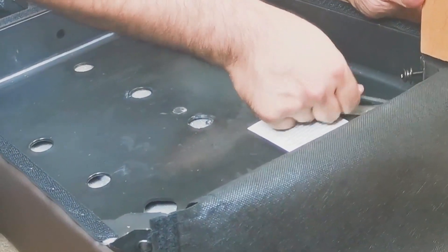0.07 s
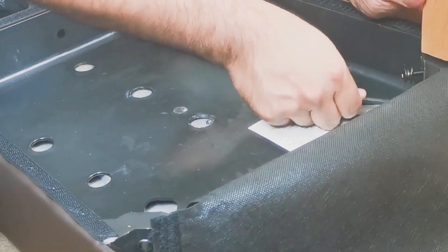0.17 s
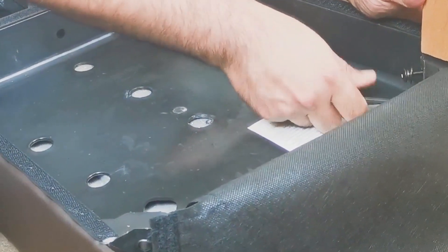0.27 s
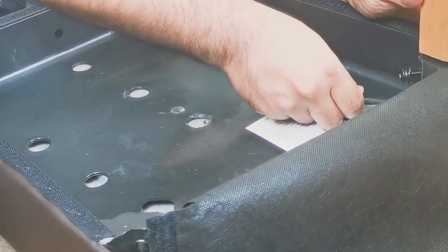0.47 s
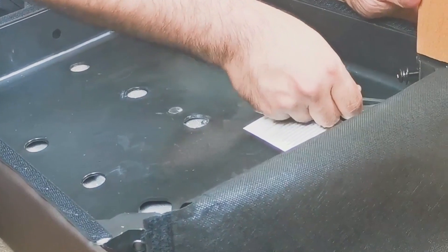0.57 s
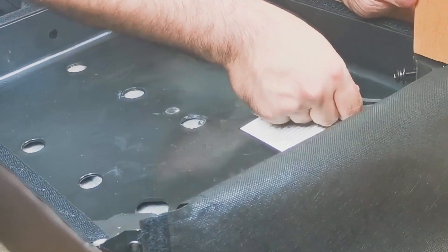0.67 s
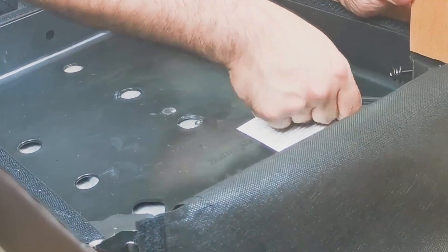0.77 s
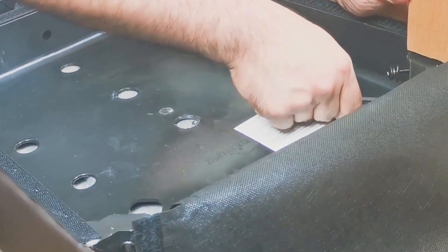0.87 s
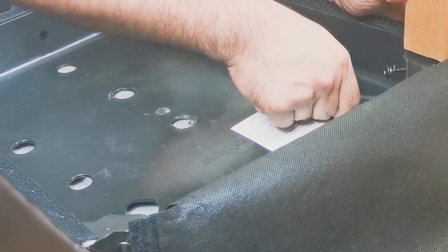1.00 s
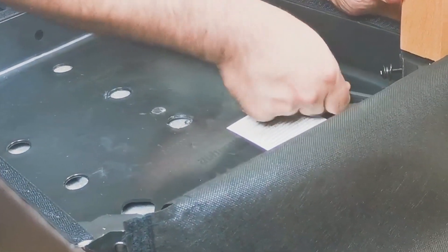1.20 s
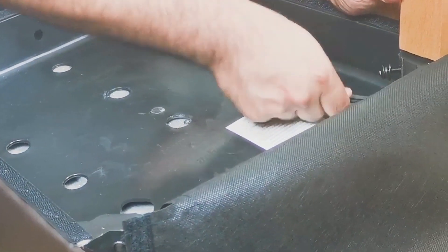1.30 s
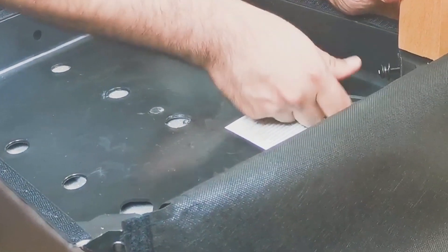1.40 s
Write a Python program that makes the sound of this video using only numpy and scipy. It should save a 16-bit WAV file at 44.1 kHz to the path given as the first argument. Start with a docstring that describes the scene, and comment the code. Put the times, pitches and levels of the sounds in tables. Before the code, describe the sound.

A single loud, hollow clack with a short ring comes early, followed by much quieter hand rustles, a low soft thud and small metallic clinks, strongest near the end, close up in a small, lively room.

```python
"""Chair assembly in a small, bare room

Stereo, with the direct sound earlier and louder in the left microphone. One hard knock rings the seat
pan: filtered noise bursts, then decaying sines. Loose steel screws and a key tick and clink as fingers
pick among them: short noise cracks with ringing modes. Between the clinks the hand rubs, softly bumps
and flexes the pan (uneven noise, band-limited bursts, low modes), over faint, steady room noise."""
import sys
import numpy as np
from scipy import signal
from scipy.fft import rfft, irfft, next_fast_len
from scipy.io import wavfile
from scipy.ndimage import map_coordinates

SR = 44100
rng = np.random.default_rng(int(sys.argv[2]) if len(sys.argv) > 2 else 0)


def put_to_file(sound):
    """Save the sound as 16-bit audio at rate SR, in the file named by the first command-line argument."""
    columns = np.atleast_2d(sound).T  # one column per channel
    safe = np.clip(columns, -1, 1)
    whole_steps = np.round(safe * 32767)
    wavfile.write(sys.argv[1], SR, whole_steps.astype(np.int16))


N = 63945  # samples

TAIL_S, RING_S = 0.55, 0.56  # lengths computed for room tails and contacts, and for ringing modes


def amp(db):
    """Decibels to gain."""
    return 10 ** (np.asarray(db) / 20)


def unit(x):
    """Scale to rms 1."""
    return x / np.sqrt(np.mean(x ** 2) + 1e-20)


def along(points, hz):
    """Read (f/Hz, value) points on a log frequency axis."""
    f, value = np.transpose(points)
    return np.interp(np.log(hz + 1), np.log(f + 1), value)


def since(s):
    """Seconds since a moment, zero before it."""
    return np.maximum(np.arange(N) / SR - s, 0)


def fade(t, attack, t60):
    """Exponential rise with time constant attack, times a 60 dB decay in t60 (both s)."""
    return (1 - np.exp(-t / attack)) * np.exp(-np.log(1000) * t / t60)


def placed(x, s):
    """Start a stereo sound at s seconds and cut it at the end of the scene."""
    return np.pad(x, ((0, 0), (round(s * SR), N)))[:, :N]


def filtered(x, response):
    """Apply a zero-phase gain that depends on frequency."""
    m = next_fast_len(N + 8192)
    return irfft(rfft(x, m) * response(np.fft.rfftfreq(m, 1 / SR)), m)[..., :N]


def coloured(x, colour_db):
    """Causal minimum-phase filter with a colour in dB; keeps the level of white noise."""
    m = 2 * next_fast_len(x.shape[-1] // 2 + 2048)
    gain = np.maximum(amp(colour_db(np.fft.rfftfreq(m, 1 / SR))), 1e-6)
    # folding the cepstrum onto positive times makes the filter causal
    cepstrum = irfft(np.log(unit(gain)), m)
    cepstrum[1:m // 2] *= 2
    cepstrum[m // 2 + 1:] = 0
    return irfft(rfft(x, m) * np.exp(rfft(cepstrum)), m)[..., :x.shape[-1]]


def noise(colour_db):
    """Steady noise of rms 1 with a colour in dB."""
    return unit(filtered(rng.standard_normal(N), lambda hz: amp(colour_db(hz))))


# likeness of the left and right microphones: f/Hz, correlation
LIKENESS = [(150, .95), (300, 0.28), (600, 0.035), (1500, 0.0035), (6000, 0)]


def half_angle(hz):
    """Half the angle whose cosine is the left-right correlation at a frequency."""
    return np.arccos(np.clip(along(LIKENESS, hz), -1, 1)) / 2


def spread(pair):
    """Turn two unrelated signals into left and right, alike in the bass."""
    mid, side = filtered(pair, lambda hz: np.array([np.cos(half_angle(hz)), np.sin(half_angle(hz))]))
    return np.array([mid + side, mid - side])


LEAD_SAMPLES, LEFT_DB = 4, 2  # delay of the right side; gain of the left, equal cut of the right


def direct(x):
    """The direct sound reaches the left microphone earlier and louder."""
    return np.array([x, np.roll(x, LEAD_SAMPLES)]) * amp([[LEFT_DB], [-LEFT_DB]])


ROOM_DB, ROOM_LEFT_DB = 1.5, 1.5  # tail energy; gain of the left, equal cut of the right
# room decay: f/Hz, t60/s
ROOM_DECAY = [(120, .45), (400, 0.38), (1500, 0.38), (4000, 0.35), (8000, 0.35), (12000, 0.3)]


def room_tail(build_s):
    """A fresh diffuse room answer: noise decaying by band, alike in the bass, stronger on the left."""
    age = np.arange(int(TAIL_S * SR)) / SR
    hz, t, z = signal.stft(rng.standard_normal((2, len(age))), SR, nperseg=256)
    decay = np.exp(-np.log(1000) * t / along(ROOM_DECAY, hz)[:, None])
    turn = half_angle(hz)[:, None]
    z = z * decay * np.array([np.cos(turn), np.sin(turn)])
    mid, side = signal.istft(z, SR, nperseg=256)[1][:, :len(age)]
    tail = np.array([mid + side, mid - side]) * (1 - np.exp(-age / build_s))
    return unit(tail) / np.sqrt(len(age)) * amp(ROOM_DB) * amp([[ROOM_LEFT_DB], [-ROOM_LEFT_DB]])


def in_room(x):
    """Direct sound plus the room's answer."""
    tail = room_tail(build_s=0.0029)
    return direct(x) + signal.fftconvolve(x[None], tail, axes=1)[:, :N]


def strike(s, attack, t60, build_s, colour_db):
    """One contact: dense modes, heard as a noise burst, die quickly and hand their energy to the room."""
    envelope = fade(np.arange(int(TAIL_S * SR)) / SR, attack, t60)
    burst = direct(envelope * rng.standard_normal(len(envelope)))
    tail = np.linalg.norm(envelope) * room_tail(build_s)
    return placed(coloured(burst + tail, colour_db), s)


SWELL_CYCLES = 0.24  # added to the attack time constant of each mode


def ring(modes, s, blur, attack, tilt_db=0):
    """Stereo ringing of struck modes, phases blurred by reflections; low modes swell more slowly."""
    t = np.arange(int(RING_S * SR)) / SR
    out = np.zeros((2, len(t)))
    for hz, db, t60 in modes:
        knots = rng.standard_normal((2, 42))
        drift = np.array([np.interp(t, np.linspace(0, RING_S, len(k)), k) for k in knots])
        apart = half_angle(hz) * np.array([[1], [-1]])
        wander = blur * (drift[0] * np.cos(apart) + drift[1] * np.sin(apart))
        offset = apart * rng.choice([-1, 1])
        phase = 2 * np.pi * (hz * t + rng.random()) + wander + offset
        level = amp(db + tilt_db * np.log2(hz / 2500))
        out += level * fade(t, attack + SWELL_CYCLES / hz, t60) * np.sin(phase)
    return placed(out, s) * amp([[ROOM_LEFT_DB], [-ROOM_LEFT_DB]])


# still air of the room: f/Hz, relative level/dB per Hz
AIR_COLOUR = [(25, -10.5), (70, 0.5), (300, -9), (700, -14.5), (1500, -15.5), (3000, -26.5), (8000, -32),
              (12000, -39), (15000, -49)]


def air():
    """The faint steady noise of the room, spread over both microphones."""
    pair = np.array([noise(lambda hz: along(AIR_COLOUR, hz)) for _ in range(2)])
    return amp(-73.5) * spread(pair)


RUB_ROUGH_DB, RUB_SLIPS_HZ = 2, 235  # spread of the slip levels; new slip levels per second
# strokes of the hand: start t/s, length/s, level/dB, brightness/dB per octave
RUB_STROKES = [(0.092, 0.19, -58, 0.5), (0.561, 0.093, -66.5, -3), (0.668, 0.05, -61, 1.5),
               (0.875, 0.075, -67.5, 2.5), (1.005, 0.065, -64, 5), (1.029, 0.084, -56.5, -3),
               (1.108, .09, -56, 0), (1.205, 0.049, -70.5, -2)]
# skin on the pan: f/Hz, relative level/dB per Hz
RUB_COLOUR = [(30, -39), (60, -24), (180, -7.5), (320, 2.5), (470, -6.5), (700, -3), (1000, -7),
              (1400, -13.5), (2200, -21), (4500, -32), (9000, -44), (12000, -47.5), (13500, -68.5)]


def rubs():
    """Skin slips unevenly over the pan; each stroke of friction noise swells and falls."""
    out = np.zeros(N)
    for s, length, db, tilt_db in RUB_STROKES:
        swell = np.sin(np.pi * np.clip(since(s) / length, 0, 1))
        slips = map_coordinates(rng.standard_normal(N // 20), [since(0) * RUB_SLIPS_HZ], order=1)
        friction = unit(amp(RUB_ROUGH_DB * slips) * rng.standard_normal(N))
        colour_db = lambda hz: along(RUB_COLOUR, hz) + tilt_db * np.log2(hz + 100)
        out += amp(db) * coloured(swell * friction, colour_db)
    return in_room(out)


BUMP_OCTAVES = 0.5  # distance from the centre at which the band is 6 dB down
# soft bumps on the pan: t/s, level/dB, centre f/Hz
BUMP_CONTACTS = [(0.125, -53.5, 315), (0.607, -55, 287.6), (0.756, -56, 362), (0.956, -58, 346),
                 (1.042, -55.5, 310), (1.048, -70, 685), (1.120, -45, 282), (1.159, -53, 699),
                 (1.175, -56, 337), (1.336, -38.5, 745), (1.339, -41.5, 332), (1.332, -50, 164)]


def bumps():
    """Soft contacts stir only a low band of the pan."""
    out = np.zeros((2, N))
    for s, db, centre_hz in BUMP_CONTACTS:
        octaves = lambda hz: np.log2((hz + 1) / centre_hz)
        band_db = lambda hz: -20 * np.log10(1 + (octaves(hz) / BUMP_OCTAVES) ** 4)
        out += amp(db) * strike(s, attack=0.0083, t60=0.12, build_s=0.0036, colour_db=band_db)
    return out


# flexing modes of the pan: f/Hz, relative level/dB, t60/s
FLEX_MODES = [(97, 0, 0.16), (121, -5, 0.25)]


def thud():
    """The hand presses the pan, which flexes with a low thud of two modes."""
    return amp(-47) * ring(FLEX_MODES, 1.096, blur=0.21, attack=0.0026)


TICK_S, TICK_RING_DB, TICK_CRACK_DB = 0.0135, -69, -57
# modes of a small screw: f/Hz, relative level/dB, t60/s
SCREW_MODES = [(1050, -5, 0.62), (2060, -6.5, 0.26), (2320, -14, .2), (2907, -10, .25), (3540, 0.5, 0.36),
               (3400, -2.5, 0.18)]
# crack of the small screw: f/Hz, relative level/dB per Hz
SCREW_CRACK = [(900, -32), (1800, -21.5), (2150, -2.5), (2700, -8.5), (3400, 0.5), (3900, -19),
               (5000, -20.5), (8000, -35.5)]


def tick():
    """A light touch on a small screw: a short noise crack and its ringing modes."""
    crack = strike(TICK_S, 0.00029, 0.039, 0.0066, lambda hz: along(SCREW_CRACK, hz))
    ringing = ring(SCREW_MODES, TICK_S, blur=1.0, attack=0.00054)
    return amp(TICK_CRACK_DB) * crack + amp(TICK_RING_DB) * ringing


RING_DB = -2.5  # added to the ring level of every clink
# steel contacts: t/s, level/dB, relative ring level/dB, relative crack level/dB,
# brightness/dB per octave, upper roll-off f/Hz, lower roll-off f/Hz
STEEL_CONTACTS = [(0.629, -77, 0, 2, 1, 15240, 7000), (0.6443, -57.5, 1, 3, -1, 5650, 910),
                  (0.658, -53.5, -2.5, 1.5, -4, 5900, 492), (0.727, -74.5, 7, 18, -4, 15000, 1970),
                  (0.7555, -60, -6, 0.5, -3, 4570, 706), (0.8815, -77.5, -2, 6.5, -3, 7000, 503),
                  (0.901, -62, -6.5, -3, -6, 4516, 600), (1.0228, -74, -8, -21, 1, 11400, 1511),
                  (1.0372, -69, -18, 5.5, -21, 9030, 1460), (1.12, -57, -3, 1, 15, 15000, 4960),
                  (1.1221, -49.5, -10.5, 2, 1, 5600, 3100), (1.3073, -71.5, -2, 3, -5, 6000, 500),
                  (1.3234, -53.5, 1, 10, -2.5, 12000, 900), (1.3283, -37.5, 1.5, 1.5, 1, 14000, 976),
                  (1.339, -32.5, -4, 0, -0.5, 11950, 300), (1.377, -43.5, -17, 3, -5.5, 11900, 593)]
# modes of the steel parts: f/Hz, relative level/dB, t60/s
STEEL_MODES = [(1142, 5.5, 0.17), (2300, -1.5, 0.088), (2393, -0.5, .25), (3310, -7, 0.32),
               (3170, -29, 0.16), (3373, -1, 0.13), (3870, 2.5, 0.13), (5010, -12, 0.15), (5100, -13, 0.37),
               (6300, -11, .12)]
# crack of a steel contact: f/Hz, relative level/dB per Hz
STEEL_CRACK = [(30, -58), (130, -19.5), (500, -3.5), (900, -3), (1150, -6), (1600, -7), (2300, -2),
               (2800, -6.5), (3600, -1.5), (4500, -8), (6200, -9.5), (9000, -12.5), (10200, -27),
               (11800, -5), (13500, -58)]


def clinks():
    """Each steel contact cracks and rings; softer contacts lose the top, smaller parts the bottom."""
    out = np.zeros((2, N))
    for s, db, ring_db, crack_db, tilt_db, soft_hz, low_hz in STEEL_CONTACTS:
        top_loss = lambda hz: 1 + (hz / soft_hz) ** 6
        bottom_loss = lambda hz: 1 + (low_hz / (hz + 50)) ** 6
        edges_db = lambda hz: -10 * np.log10(top_loss(hz) * bottom_loss(hz))
        tilted_db = lambda hz: along(STEEL_CRACK, hz) + tilt_db * np.log2((hz + 300) / 2500)
        crack = strike(s, 0.00042, 0.06, 0.0047, lambda hz: tilted_db(hz) + edges_db(hz))
        ringing = ring(STEEL_MODES, s, blur=1.0, attack=0.0016, tilt_db=tilt_db)
        out += amp(db) * (amp(crack_db) * crack + amp(RING_DB + ring_db) * ringing)
    return out


SNAP_DB, CLACK_DB, PAN_DB = -13, -14.5, -23.5
# contacts of the knock, the second being the blow: t/s, relative clack level/dB
KNOCK_CONTACTS = [(0.21, -27.5), (0.2139, 2), (0.2217, -8.5)]
# first, hard snap: f/Hz, relative level/dB per Hz
SNAP_COLOUR = [(30, -60), (80, -31), (160, 6), (260, 8), (450, -0.5), (900, 1.5), (1700, -1), (2700, -7),
               (4200, -18), (8000, -29), (11800, -18), (13500, -36), (15500, -32.5)]
# dense, short-lived modes of the pan: f/Hz, relative level/dB per Hz
CLACK_COLOUR = [(25, -59), (60, -45.5), (95, -22), (140, -5), (230, -2), (330, -1), (500, 1), (700, -1),
                (1250, 0.5), (2000, -3.5), (2800, -8.5), (3700, -8.5), (4400, -16), (5200, -12),
                (6500, -16.5), (8900, -20), (10000, -38), (11200, -24.5), (12400, -22), (13600, -48),
                (15500, -39.5)]
# seat pan modes: f/Hz, relative level/dB, t60/s
PAN_MODES = [(131.9, -17.5, 0.16), (183.6, -9.5, 0.29), (213.4, -7, 0.34), (296.5, -4, 0.32),
             (337, -4, 0.31), (485, -4.5, .23), (618.6, -4.5, 0.33), (715, 6, 0.13), (998, -1.5, 0.31),
             (1086, 4, .2), (1099, 2, .22), (1216, 0.5, 0.44), (1380, -2, 0.084), (1710, 5, .2),
             (1665, -5, 0.39), (1970, -3, .2), (2434, -12, .22), (3380, -12.5, 0.11), (5090, -16, 0.12)]


def knock():
    """A hard blow and its rebound: a snap and a short clack, then the pan rings."""
    blow_s = KNOCK_CONTACTS[1][0]
    burst = fade(since(blow_s), attack=0.0002, t60=0.024) * rng.standard_normal(N)
    snap = coloured(burst, lambda hz: along(SNAP_COLOUR, hz))
    clack = np.zeros((2, N))
    for s, db in KNOCK_CONTACTS:
        clack += amp(db) * strike(s, 0.00033, 0.083, 0.0017, lambda hz: along(CLACK_COLOUR, hz))
    pan = ring(PAN_MODES, blow_s, blur=0.4, attack=0.001)
    return amp(SNAP_DB) * direct(snap) + amp(CLACK_DB) * clack + amp(PAN_DB) * pan


def scene():
    """All sources together, from the background to the knock."""
    return air() + rubs() + bumps() + thud() + tick() + clinks() + knock()


PEAK, TOP_HZ = 0.92, 16000  # ceiling of the rounding; upper band limit


def record(dry):
    """The recorder rounds the highest peaks and keeps nothing above its band limit."""
    rounded = dry / (1 + np.abs(dry / PEAK) ** 8) ** (1 / 8)
    return filtered(rounded, lambda hz: np.clip((TOP_HZ - hz) / 400, 0, 1))


dry = scene()
out = record(dry)
put_to_file(out)
```